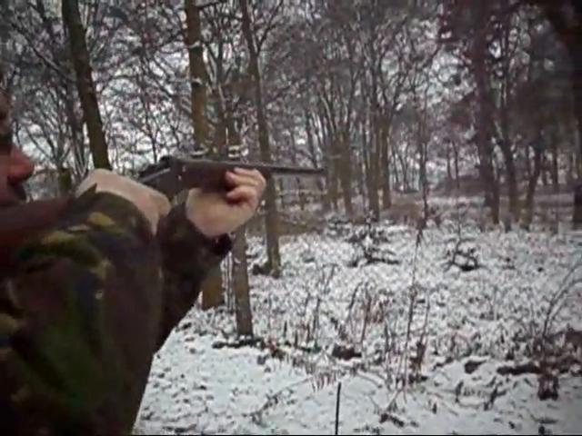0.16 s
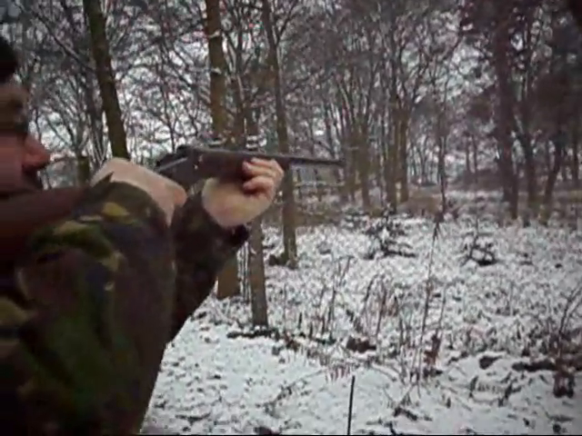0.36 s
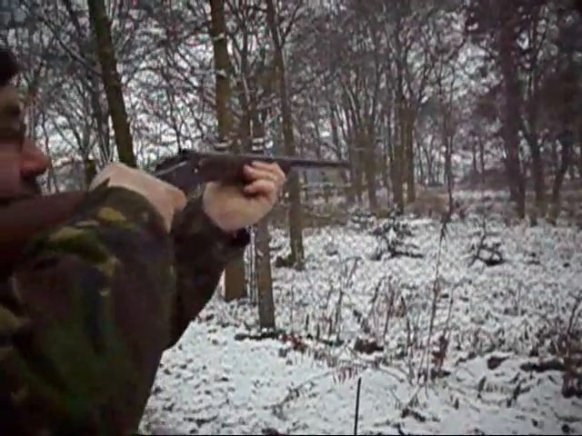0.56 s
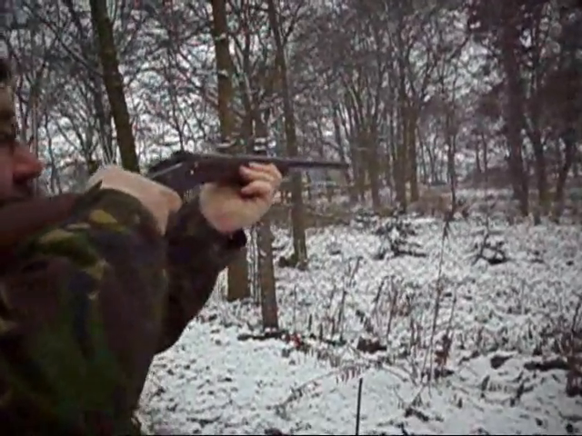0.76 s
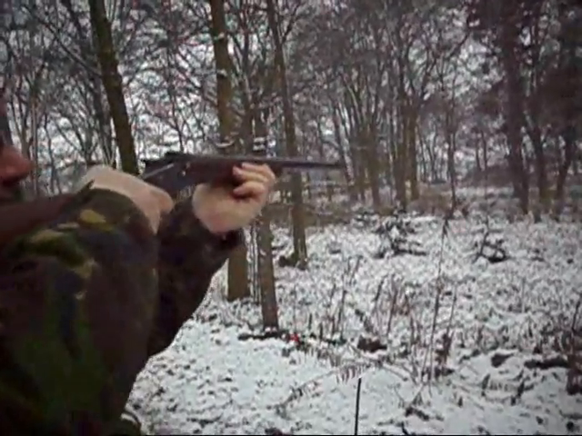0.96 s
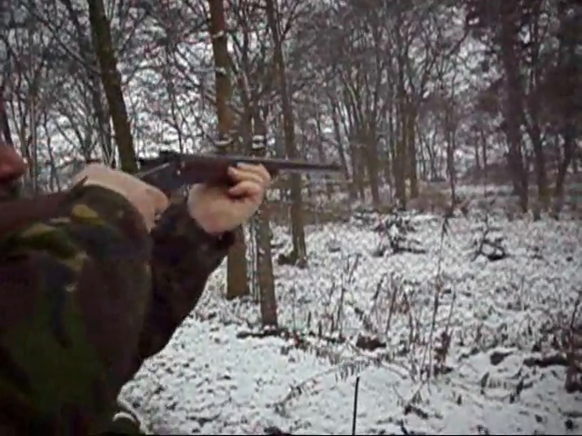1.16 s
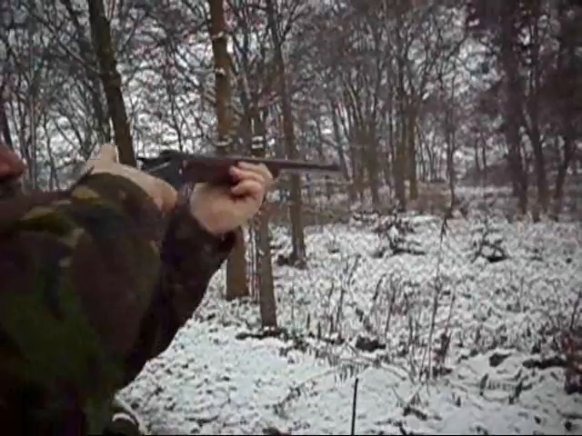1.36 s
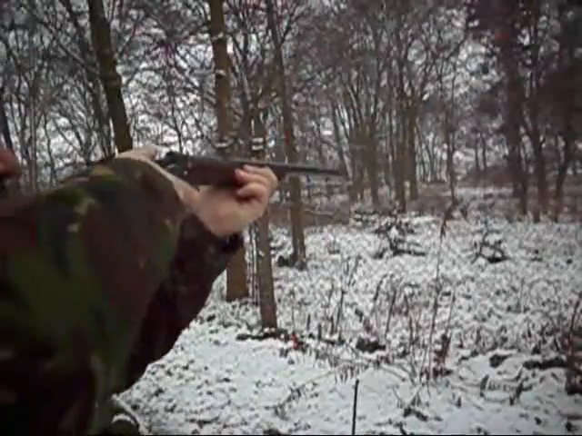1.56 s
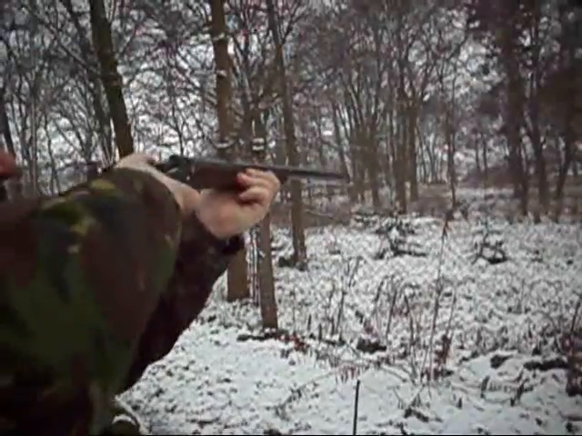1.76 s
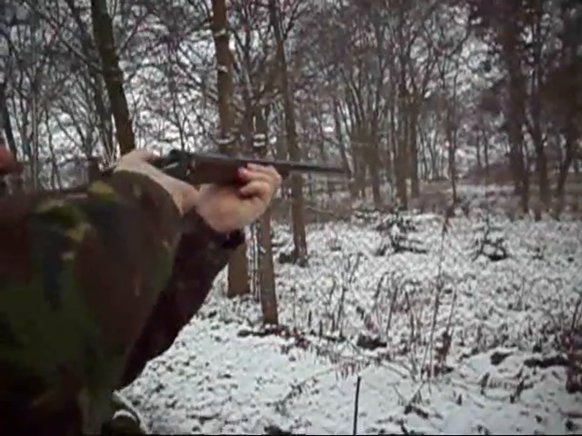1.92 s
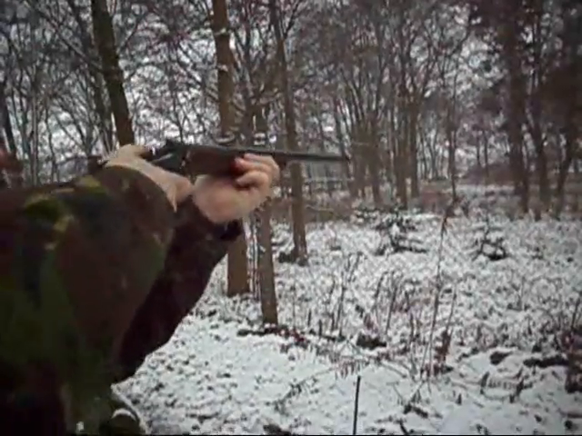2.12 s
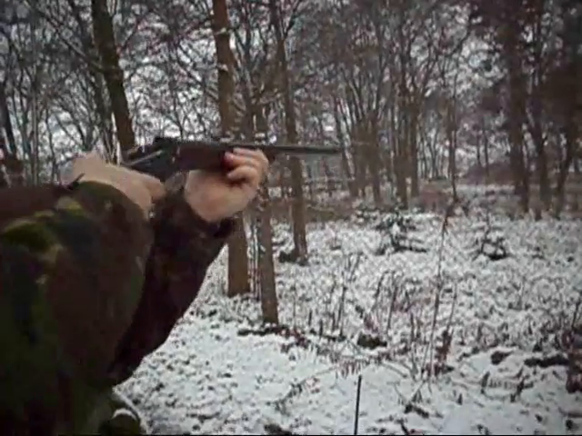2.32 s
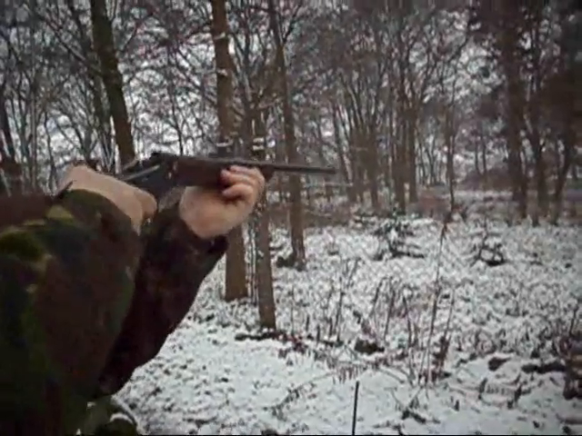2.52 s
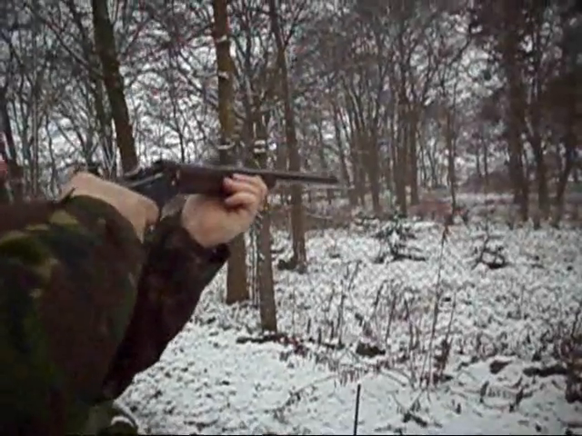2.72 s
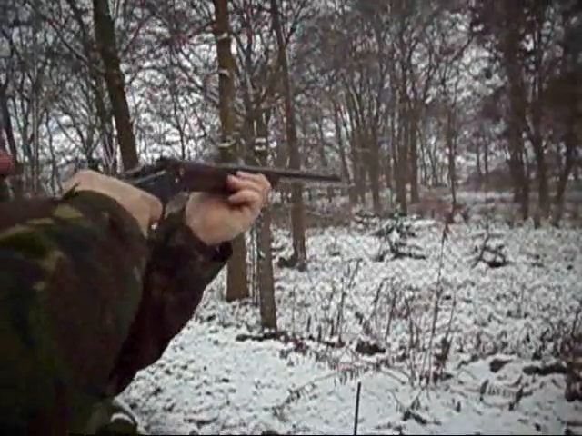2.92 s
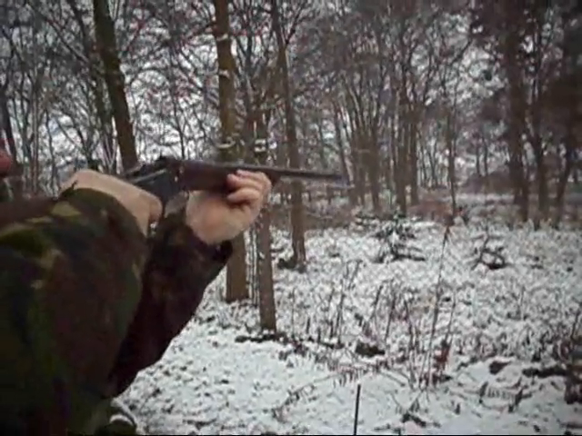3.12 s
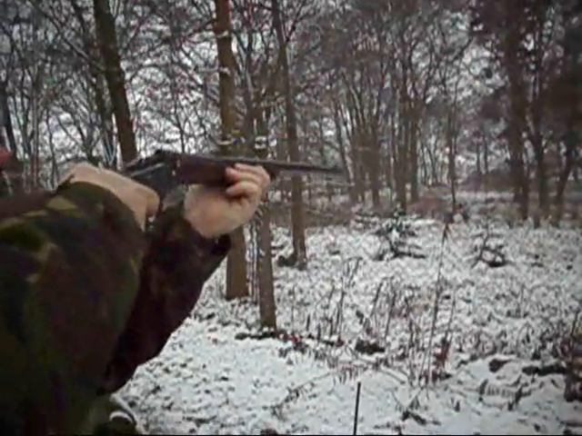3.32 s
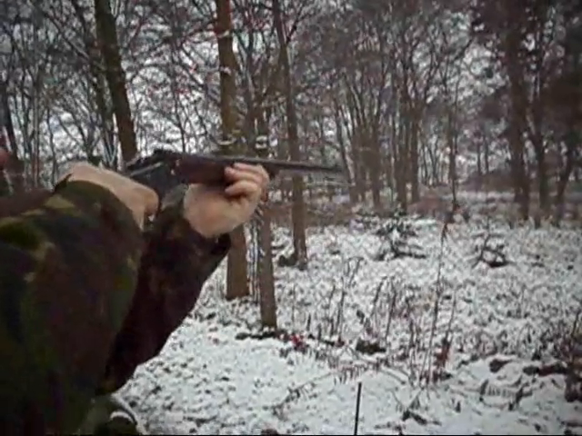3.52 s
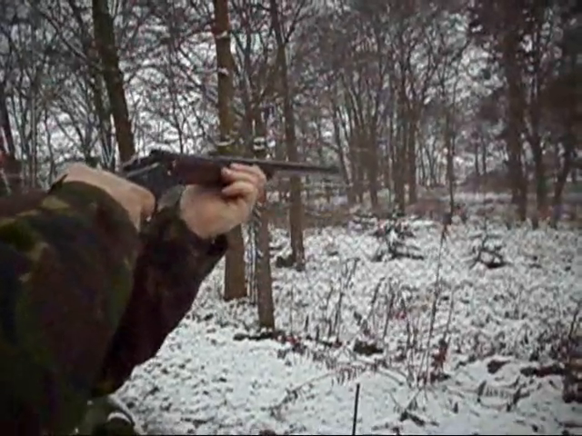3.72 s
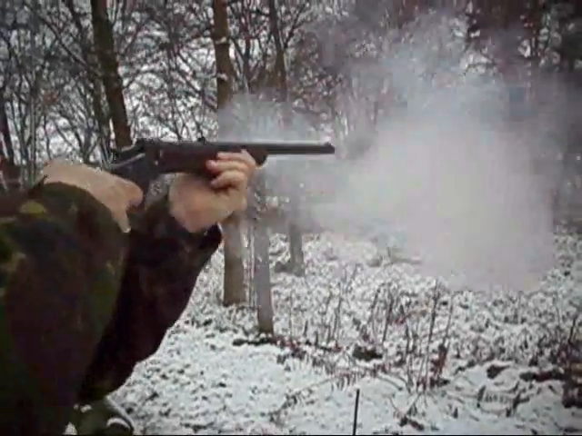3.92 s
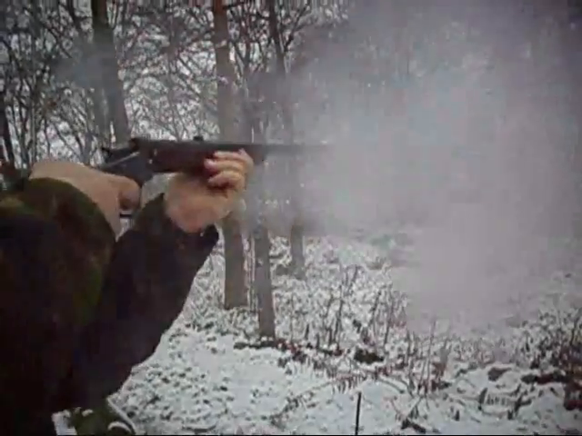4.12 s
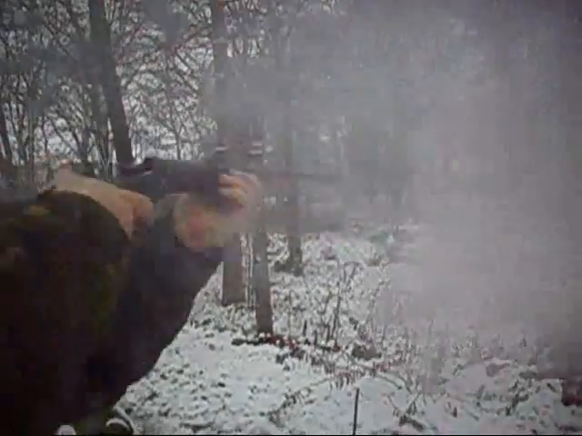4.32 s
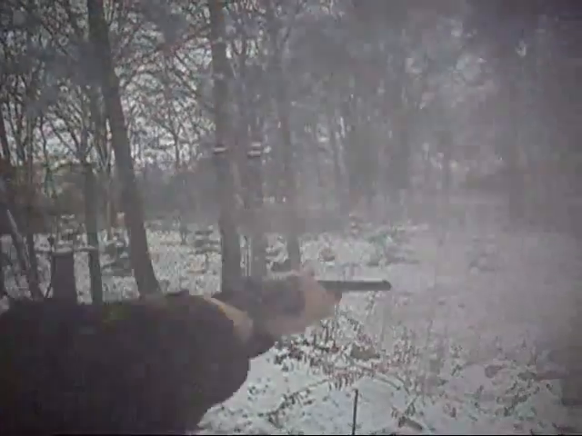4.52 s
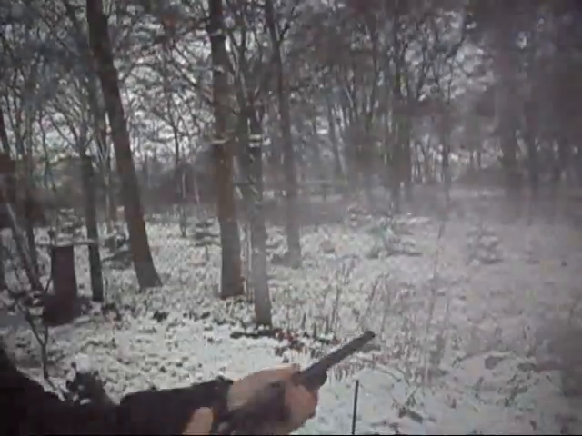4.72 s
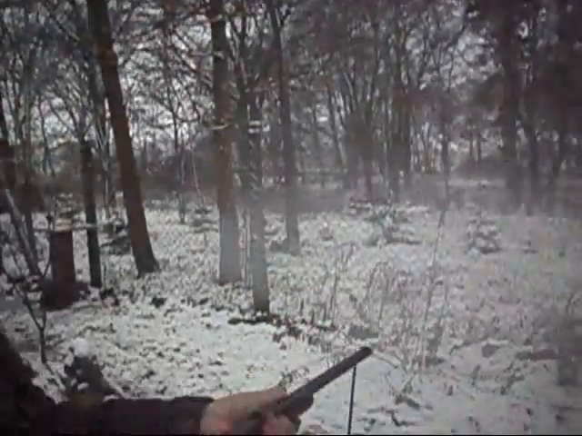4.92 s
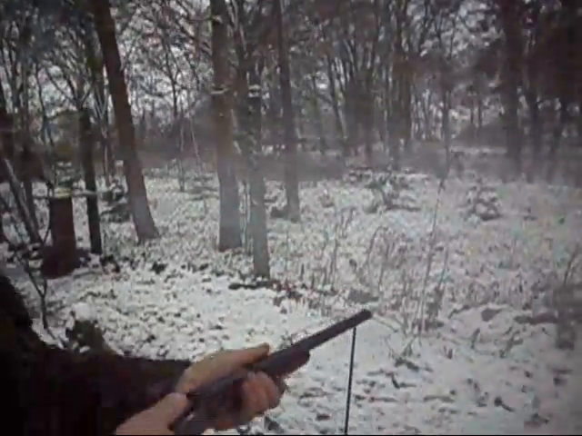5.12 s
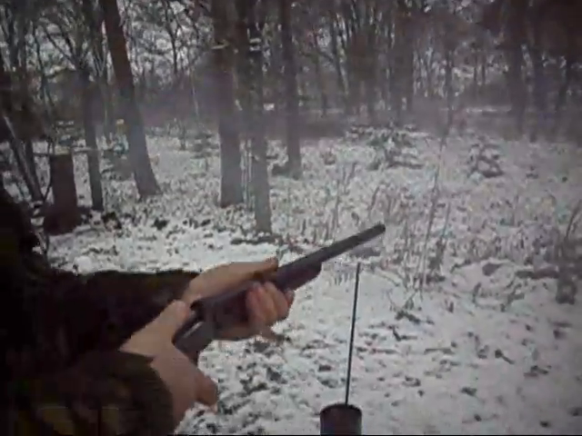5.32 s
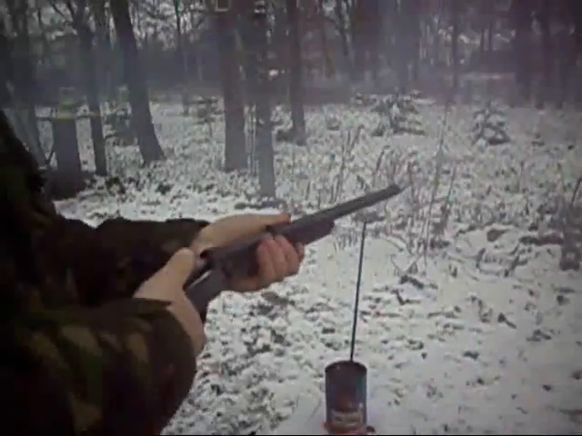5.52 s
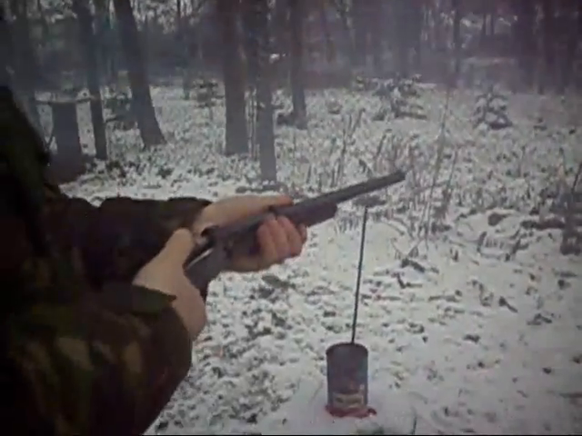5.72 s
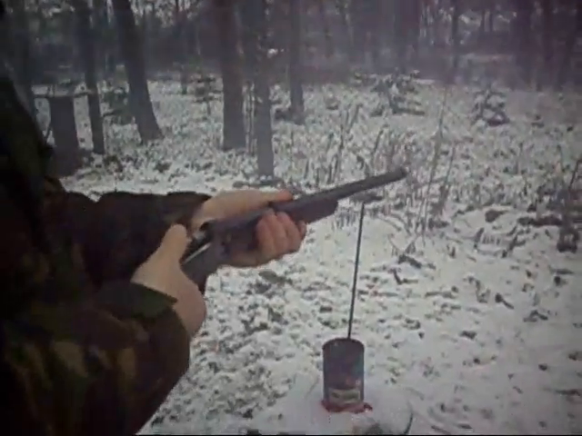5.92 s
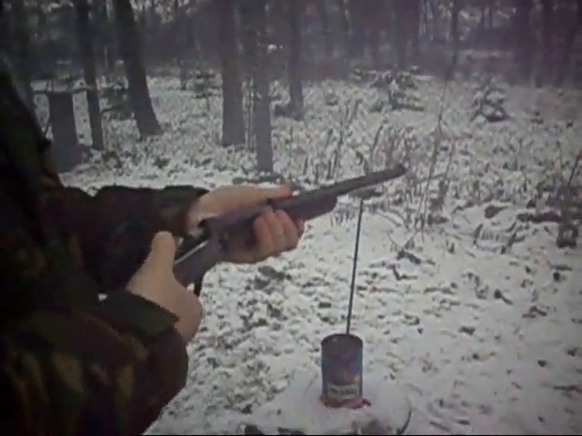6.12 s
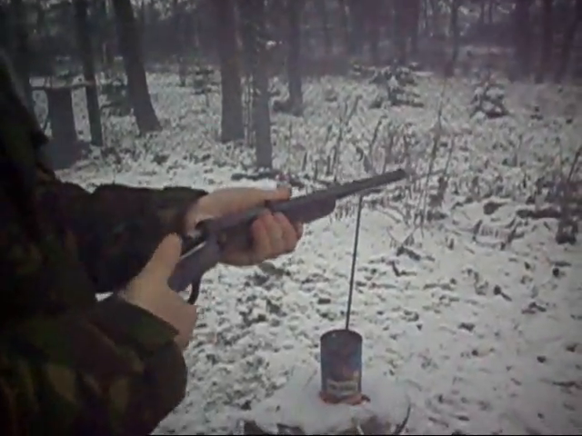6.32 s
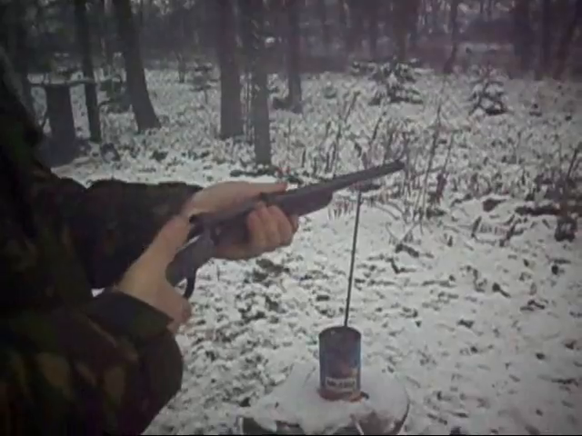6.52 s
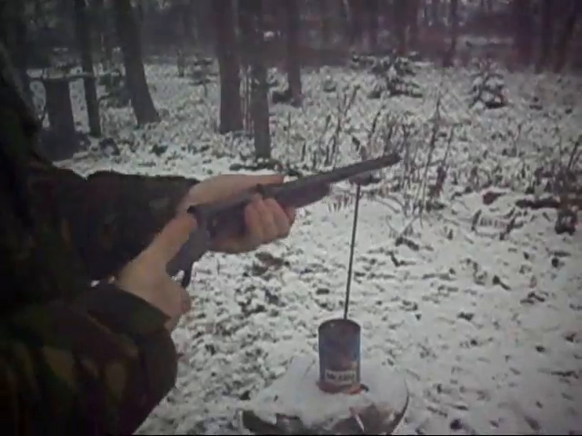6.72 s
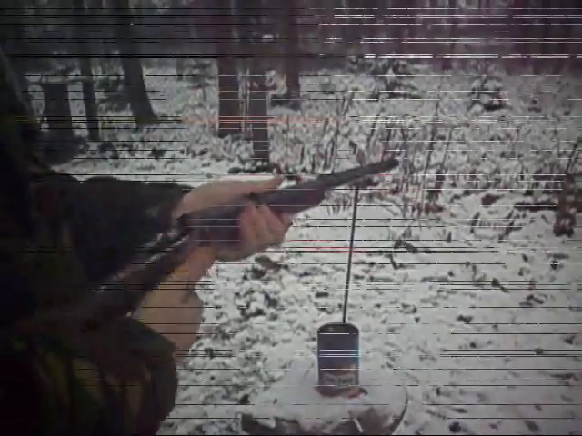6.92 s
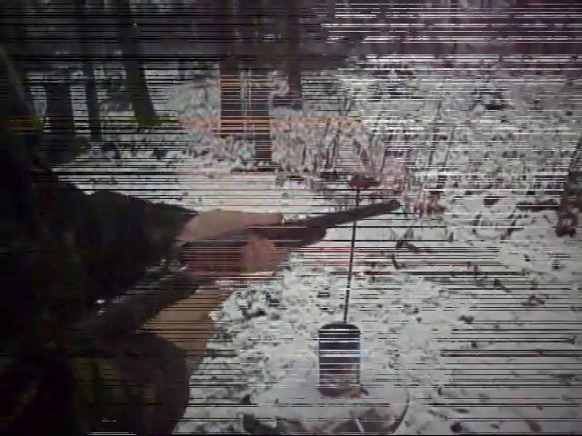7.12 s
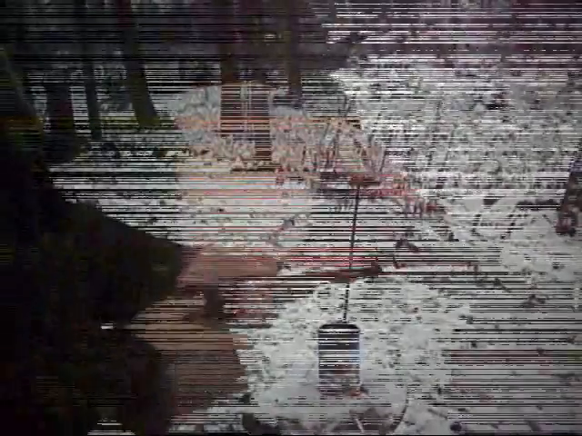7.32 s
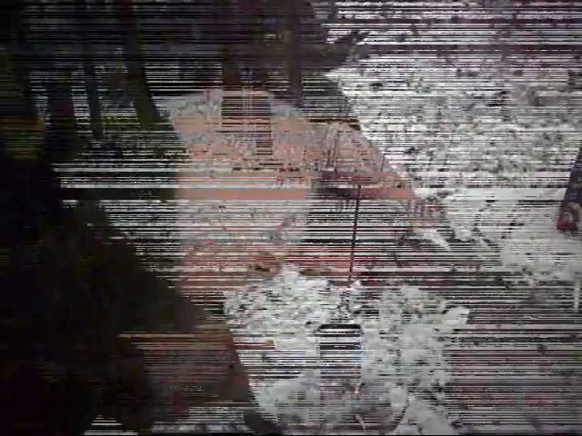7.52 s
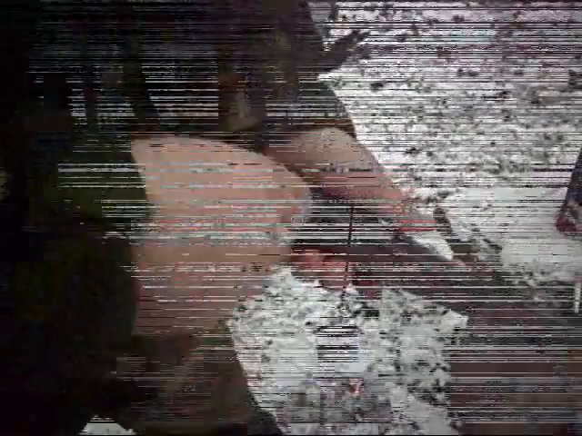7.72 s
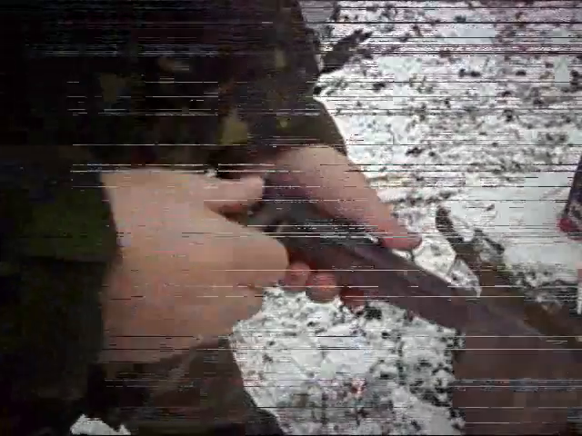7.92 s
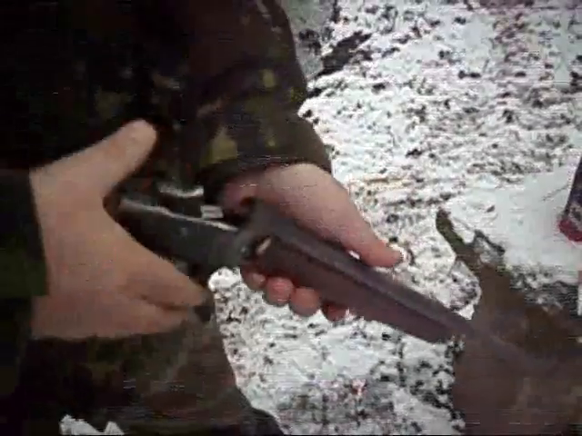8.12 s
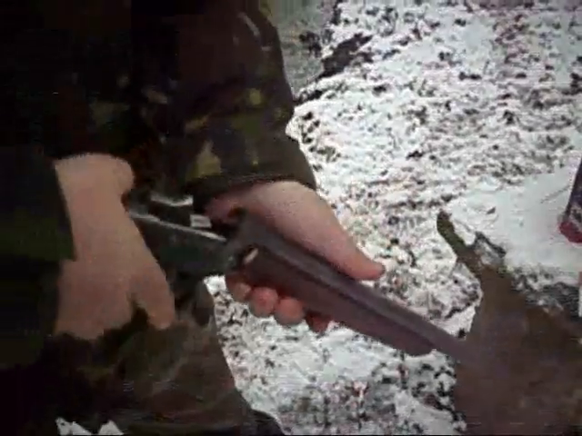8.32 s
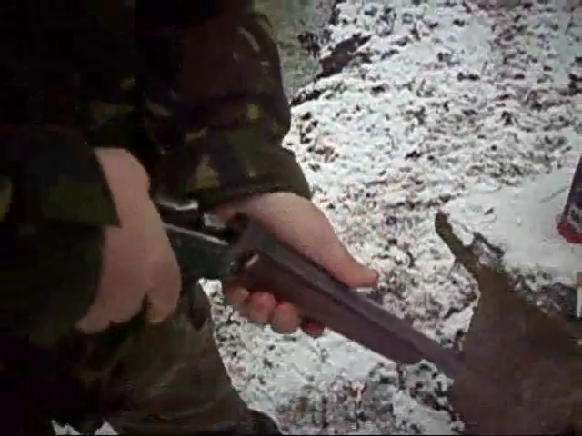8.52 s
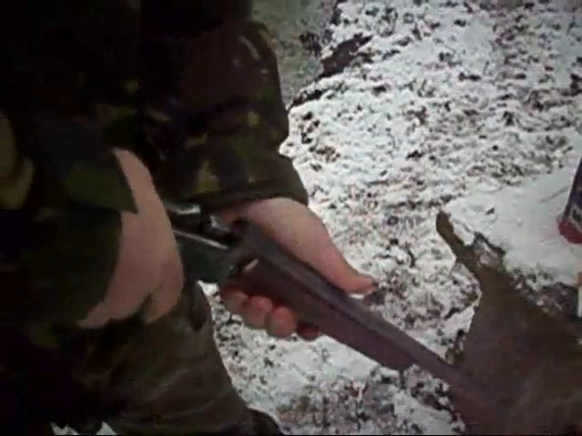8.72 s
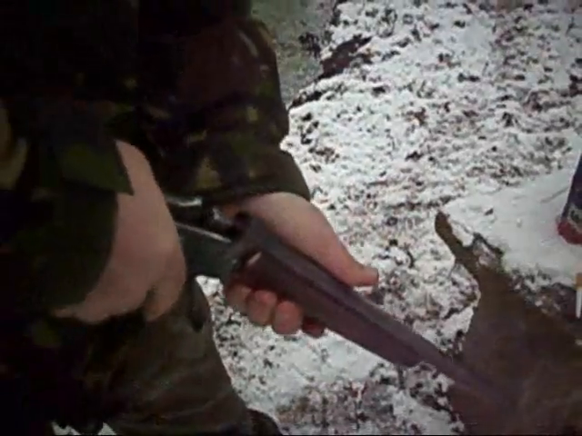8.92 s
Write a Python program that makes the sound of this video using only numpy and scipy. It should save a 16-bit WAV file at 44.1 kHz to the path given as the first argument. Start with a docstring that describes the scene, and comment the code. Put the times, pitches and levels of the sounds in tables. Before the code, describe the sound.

Sharp steel clicks over low wind thumps, then one overloaded gunshot cracks and rolls off through trees, followed by clicks and a cloth rustle.

```python
"""Rifle shot in a snowy wood

A small rifle is cocked, fired once and opened: struck steel modes, and shaped noise for blast and tree echo.
Wind is low noise with pressure dips; cloth rustle is flickering noise; a motor-like drone of wavering
harmonics over a rumble swells after the shot. A cheap camera adds hiss and whine, is overloaded by the
blast, and samples coarsely."""
import sys
import numpy as np
from scipy import signal
from scipy.io import wavfile
from scipy.ndimage import uniform_filter1d

SR = 44100
rng = np.random.default_rng(int(sys.argv[2]) if len(sys.argv) > 2 else 0)


def to_wav(s):
    """Save 16-bit WAV."""
    ch = np.atleast_2d(s).T  # columns
    pcm = np.round(np.clip(ch, -1, 1) * 32767)  # PCM
    wavfile.write(sys.argv[1], SR, pcm.astype(np.int16))


N = 399546


def amp(db):
    """Decibels to gain."""
    return 10 ** (np.asarray(db) / 20)


def colour(points, hz):
    """A spectrum table read on a log-frequency axis."""
    f, value = np.transpose(points)
    return np.interp(np.log(hz + 1), np.log(f + 1), value)


def curve(rows, column=1, outside_db=None):
    """One column of a table for every sample; the end values hold unless outside_db is given."""
    rows = np.asarray(rows)
    return np.interp(np.arange(N) / SR, rows[:, 0], rows[:, column], outside_db, outside_db)


def bump(s, width_s):
    """A bell-shaped swell of height 1 around time s."""
    return np.exp(-.5 * ((np.arange(N) / SR - s) / width_s) ** 2)


def noise(points, size, patchy_db, loss=None, since=0):
    """Coloured noise of rms 1 with drifting patches; loss reshapes the spectrum over time at equal power."""
    hop = size // 4
    frames, hz = N // hop + 5, np.fft.rfftfreq(size, 1 / SR)
    real, imag, patches = rng.standard_normal((3, frames, len(hz)))
    patches = uniform_filter1d(patches, size=5, axis=0)  # over time
    patches = uniform_filter1d(patches, size=7, axis=1)  # over frequency
    db = colour(points, hz)[None]
    if loss:
        age_s = np.clip(np.arange(frames) * hop / SR - since, -.4, 2)
        db = db - colour(loss, hz) * age_s[:, None]
    gain = amp(db) / np.sqrt(np.mean(amp(db) ** 2, axis=1, keepdims=True))
    spectra = (real + 1j * imag) * gain * amp(patchy_db * patches / patches.std())
    x = signal.istft(spectra.T, nperseg=size, noverlap=size - hop)[1][:N]
    return x / x.std()


def add(mix, s, sound):
    """Mixes a sound in at time s."""
    part = mix[max(round(s * SR), 0):][:len(sound)]
    part += sound[:len(part)]


def camera():
    """Electronic hiss and a steady whine of two sines."""
    # hiss spectrum: f/Hz, density/dB per Hz
    hiss_colour = [(150, -29), (250, -4.5), (761, -12), (835, -9.5), (906, -12), (1580, -13), (4000, -14),
                   (5200, -63), (8800, -120)]
    # whine lines: f/Hz, rms level/dB
    whine_lines = [(812.9, -54.5), (1625.8, -63)]
    hiss_db = -50.5
    t = np.arange(N) / SR
    whine = sum(np.sqrt(2) * amp(db) * np.sin(2 * np.pi * hz * t) for hz, db in whine_lines)
    hiss = noise(hiss_colour, size=1024, patchy_db=.4)
    return hiss * amp(hiss_db) + whine


def wind():
    """Lumpy low pressure noise on the microphone, and sharp dips with a rebound on both sides."""
    # wind on the microphone: t/s, level/dB
    wind_level = [(0., -34.5), (.1, -35), (.7, -35.5), (1.2, -33), (1.55, -31), (2.0, -29.5), (2.15, -31.5),
                  (2.5, -34), (2.95, -36.5), (3.5, -29), (3.65, -34.5), (4.9, -30), (5.6, -31.5),
                  (6.0, -29.5), (6.8, -32), (7.25, -32), (7.45, -41), (9.06, -35.5)]
    # wind spectrum: f/Hz, density/dB per Hz
    wind_colour = [(4.7, -40), (8.0, 3.5), (24, -1), (47, -4.5), (103, -16.5), (245, -34), (357, -42.5),
                   (400, -59), (520, -87), (880, -120)]
    # gust pops, pressure dips: t/s, nominal depth/dB, width/ms
    pops = [(0.594, -21, 5.8), (1.043, -20.5, 3.5), (1.147, -19, 5), (1.393, -18, 4.2), (1.458, -22, 3.7),
            (1.704, -12.5, 4.4), (2.623, -12, 6.9), (2.686, -15, 4.2), (2.732, -13.5, 7.9),
            (3.121, -18.5, 1.85), (3.196, -24, 3.7), (3.299, -14.5, 2.6), (3.785, -8.5, 2.04),
            (3.818, -16, 5.1), (5.191, -17, 13), (5.97, -20, 16), (6.075, -25, 16), (6.191, -12.5, 4.8),
            (6.31, -19, 9.7), (6.423, -19.5, 4.8), (6.644, -23.5, 3.9), (7.055, -24, 4.1), (7.6, -30, 12)]
    buffet_db, buffet_s = -14, 0.032  # swell of wind round each pop: level re its depth, bell width
    small_pops, small_pop_db, small_pop_ms = 24, 2., 7.  # count, depth re wind level, mean width
    level_db = curve(wind_level)
    swell = amp(level_db) + sum(amp(db + buffet_db) * bump(s, buffet_s) for s, db, _ in pops)
    out = noise(wind_colour, size=4096, patchy_db=1.5) * swell
    small = [(a * N / SR, level_db[int(a * N)] + small_pop_db, small_pop_ms * (.5 + b))
             for a, b in rng.random((small_pops, 2))]  # at random times
    for s, db, width_ms in pops + small:
        u = np.arange(-.06, .06, 1 / SR) / (width_ms / 1000 / 2)
        dip = np.exp(-u ** 2 * 0.42)
        rebound = 0.33 * np.exp(-u ** 2 * 0.25)
        add(out, s - .06, -amp(db) * (dip - rebound) / (1 - 0.36))
    return out


def drone():
    """Harmonics of a slow firing rate, each wavering in level, over a noise rumble."""
    # swell of the drone: t/s, gain/dB
    drone_level = [(0., -50.5), (2.7, -49.5), (3.3, -50), (5.2, -39.5), (5.5, -40), (6.4, -40.5),
                   (7.06, -39), (7.4, -44), (8.35, -38), (9.06, -40)]
    # harmonics: multiple of the firing rate, peak level re drone gain/dB before waver
    orders = [(1, -5), (2, -1), (3, -6), (4, -15), (5, -2), (6, -7), (7, -6), (8, -13), (9, -13), (10, -14),
              (11, -16), (12, -18), (13, -19), (14, -17), (15, -22), (16, -23), (17, -19)]
    # rumble spectrum: f/Hz, density/dB per Hz
    rumble_colour = [(59, -22), (100, 3.5), (169, 1.5), (286, -3), (659, -4), (807, -4.5), (1240, -16.5),
                     (2500, -36), (3250, -68), (5500, -120)]
    firing_hz, rumble_db = 30.27, -7  # rumble rms re drone gain
    t = np.arange(N) / SR
    turns = firing_hz * t + 0.043 * np.sin(2 * np.pi * .4 * t)  # slight pitch wobble
    lines = np.zeros(N)
    for (k, db), (phase, beat) in zip(orders, rng.random((len(orders), 2))):
        waver_db = 3 * np.sin(2 * np.pi * ((0.209 + .5 * beat) * t + phase))
        lines += amp(db + waver_db) * np.sin(2 * np.pi * (k * turns + phase))
    rumble = noise(rumble_colour, size=1024, patchy_db=2.2)
    return (lines + rumble * amp(rumble_db)) * amp(curve(drone_level))


def rustle():
    """Sleeve cloth: noise whose level flickers in short grains."""
    # sleeve movement: t/s, level/dB before flicker
    rustle_level = [(7.8, -84), (8.0, -62), (8.3, -50), (8.5, -49.5), (8.85, -56), (9.06, -61)]
    # cloth spectrum: f/Hz, density/dB per Hz
    rustle_colour = [(300, -41), (700, 11), (1500, -12), (3500, -8.5), (5000, -55)]
    flicker = uniform_filter1d(rng.standard_normal(N), size=300)
    cloth = noise(rustle_colour, size=256, patchy_db=1.5)
    return cloth * amp(curve(rustle_level) + 3.2 * flicker / flicker.std())


def ring(drive, small_hz, heavy_hz, heavy_db, share):
    """Lock modes struck by a drive, strongest near the pitches of both parts; neighbours swing opposite ways."""
    # stock and lock steel modes: f/Hz, level/dB, free-ring t60/s
    lock_modes = [(340, 0, .04), (470, 0, .03), (590, 0, .085), (720, -2, .03), (860, -1, .03),
                  (1068, -1, .06), (1400, 0, .025), (1720, -2, .025), (1980, 0, .022), (2340, 0, .022),
                  (2850, 0, .025), (3150, -3, .025), (3420, 0, .022), (3720, 0, .022), (3950, 0, .016)]
    small_fall_db, heavy_fall_db = 11.5, 18.5  # dB per octave away from the pitch of each part
    t = np.arange(round(.12 * SR)) / SR
    body = np.zeros(len(t))
    for k, (hz, db, t60) in enumerate(lock_modes):
        small = amp(-small_fall_db * abs(np.log2(hz / small_hz)))
        heavy = amp(heavy_db - heavy_fall_db * abs(np.log2(hz / heavy_hz)))
        decay = amp(db - 60 * t / (t60 * max(share, .15)))
        body += (-1) ** k * (small + heavy) * decay * np.sin(2 * np.pi * hz * t)
    return signal.oaconvolve(drive, body)


def slide():
    """The breech speeds up, then stops: stick-slip grains of steel on steel ring mainly the low lock modes."""
    start_s, stop_s, fade_s = 6.86, 6.975, .025
    stop_db, rise_db = -34, 9.
    grains_per_s = 1500
    hits = rng.random(N) < grains_per_s / SR
    grains = hits * rng.standard_normal(N) * amp(1.4 * rng.exponential(1, N))
    sound = ring(grains, small_hz=3700, heavy_hz=730, heavy_db=16., share=.2)[:N]
    stroke = [(start_s - 2 * fade_s, -70), (start_s, stop_db - rise_db),
              (stop_s, stop_db), (stop_s + fade_s, -60)]
    return sound / sound.std() * amp(curve(stroke, outside_db=-120))


def clicks():
    """Each click is a blow and a short rattle of contacts that ring the lock, with a faint tail from the trees."""
    # lock clicks: t/s, peak level/dB, small struck part f/Hz, heavy part under it f/Hz,
    # heavy re small level/dB, rattle decay/ms, ring length/share of the free ring
    click_rows = [(0.521, -26.5, 2560, 900, -20, 1.8, 0.66), (.898, -8.5, 3200, 400, -4.5, 2., 0.59),
                  (0.9007, 5, 3680, 1068, -6, 3.9, 0.87), (.903, -2, 2340, 420, -6, 2.8, 0.69),
                  (.9105, -26, 3700, 1068, -18, 1., .6), (1.209, -19.5, 2280, 795, -10, 2.6, 0.83),
                  (1.623, -4.5, 3180, 1440, -0.5, 6.4, 0.39), (1.626, -17.5, 840, 360, -10, 2., 0.46),
                  (1.688, -26, 3600, 1100, -10, 2., 0.62), (1.996, -2, 2150, 1400, -19, 3.9, 0.62),
                  (3.8481, -14, 2200, 700, -2, 2.2, .6), (5.595, -30, 1600, 650, 17, 1.5, .6),
                  (5.685, -4.5, 2460, 804, -2.5, 3.6, 0.8), (6.0929, -4, 2680, 490, -5.5, 7.9, 0.63),
                  (6.13, -33, 3700, 1100, -4, 2., .6), (6.873, -31.5, 2200, 1000, -2, 2.2, .6),
                  (6.952, -19, 3580, 440, 7, 2., 0.79), (6.973, -23, 1100, 590, 13, 1.3, 0.52),
                  (7.0835, -12.5, 3920, 350, -31, 3.1, 1), (7.085, -9, 3920, 560, 30, 3., 0.86)]
    out, t = np.zeros(N), np.arange(900) / SR
    chances = rng.standard_normal((len(click_rows), len(t)))
    for (s, db, *parts, rattle_ms, share), chance in zip(click_rows, chances):
        drive = chance * np.exp(-t * 1000 / max(rattle_ms, .1)) * .035
        drive[0] = 1  # the blow
        sound = ring(drive, *parts, share)
        add(out, s, amp(db) * sound / abs(sound).max())
    t = np.arange(round(.15 * SR)) / SR
    tail = rng.standard_normal(len(t)) * amp(-52.5 - 60 * t / 0.23) * (t > .008)
    return out + signal.oaconvolve(out, tail)[:N]


def shot():
    """Noise blast with dense near reflections, slaps off trunks, and a rolling echo that falls at two rates."""
    # blast with its dense near reflections: t/s, level/dB re full scale
    blast_level = [(3.8515, -30), (3.8525, 2), (3.88, 8), (3.96, 9), (4.075, -1), (4.095, -8), (4.35, -16),
                   (4.6, -29), (5.0, -52)]
    # blast spectrum: f/Hz, density/dB per Hz
    blast_colour = [(20, 0.5), (70, -1), (200, -7.5), (500, -12.5), (1000, -11.5), (2000, -14.5),
                    (4000, -20), (6000, -44.5)]
    # the boom outlasts the crack: f/Hz, relative loss/dB per s
    blast_loss = [(100, 1), (160, 22), (400, 18.5), (1000, 16.5), (4000, 31)]
    # strong returns from the ground and the nearest trunks: t/s, level/dB, hold/ms
    returns = [(3.861, 21, 13), (3.886, 33, 13), (3.9085, 27, 2), (3.931, 22, 3), (3.950, 19, 5)]
    # single slaps from thick trunks: t/s, level/dB
    slaps = [(4.1035, 1), (4.1155, 5), (4.1785, 5), (4.33, -14)]
    # echo spectrum: f/Hz, density/dB per Hz
    echo_colour = [(88, -46), (150, -43), (206, -17), (302, -4.5), (392, -12.5), (601, 0.5), (718, -2.5),
                   (958, 0), (1370, -13), (2470, -18.5), (4000, -31.5), (5200, -27), (8800, -120)]
    # the echo loses its bass fastest: f/Hz, relative loss/dB per s
    echo_loss = [(100, 22), (800, 4), (1500, 5.5), (3000, 6)]
    # rolls of the echo, from stands of trees: t/s, lift/dB
    rolls = [(4.19, 1.5), (4.33, -0.5), (4.46, 3), (4.61, 3), (4.74, 3.5), (4.93, 4), (5.049, 1.5),
             (5.5, 3)]
    edge_s, roll_s = .003, .035  # ramp of each return, bell width of each roll
    echo_hold_s = 4.128  # the falls begin here
    early_db, early_fall_db_per_s = -10.5, 30
    late_db, late_fall_db_per_s = -28, 12.5

    level = amp(curve(blast_level, outside_db=-120))
    for s, db, ms in returns:
        end_s = s + ms / 1000
        level += amp(db) * curve([(s - edge_s, 0), (s, 1), (end_s, 1), (end_s + edge_s, 0)])
    near = noise(blast_colour, size=512, patchy_db=3.0, loss=blast_loss, since=4.07) * level

    far = noise(echo_colour, size=1024, patchy_db=1.7, loss=echo_loss, since=4.5)
    t = np.arange(N) / SR
    since = np.maximum(t - echo_hold_s, 0)
    fall = amp(early_db - early_fall_db_per_s * since) + amp(late_db - late_fall_db_per_s * since)
    lift_db = sum(db * bump(s, roll_s) for s, db in rolls)
    far *= (t > returns[-1][0]) * fall * amp(lift_db)  # starts at the last return

    t = np.arange(400) / SR
    for (s, db), chance in zip(slaps, rng.standard_normal((len(slaps), len(t)))):
        slap = uniform_filter1d(chance, size=4) * 2 * np.exp(-t / .0018)
        add(near, s - .001, amp(db) * slap)
    return near + far


def scene():
    """All sources at the one microphone."""
    return (clicks() + slide() + rustle() + shot() + wind() + drone() + camera())[None]


def record(dry):
    """The converter clips, reads almost zero if far overdriven, and holds coarse samples, mirroring sound upward."""
    full_scale, overflow = .98, 2.0
    leak = .0016  # share that still passes when far overdriven
    rate_hz, edge_hz = 8005, 15550  # converter sample rate, output low-pass
    read = np.where(abs(dry) < overflow, np.clip(dry, -full_scale, full_scale), leak * dry)
    held = np.floor(np.arange(N) * rate_hz / SR) * SR / rate_hz
    steps = read[:, np.ceil(held).astype(int).clip(0, N - 1)]
    low_pass = signal.firwin(511, edge_hz, window=("kaiser", 9), fs=SR)
    return signal.oaconvolve(steps, low_pass[None], "same")


dry = scene()
out = record(dry)
to_wav(out)
```